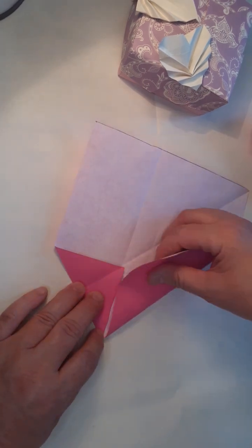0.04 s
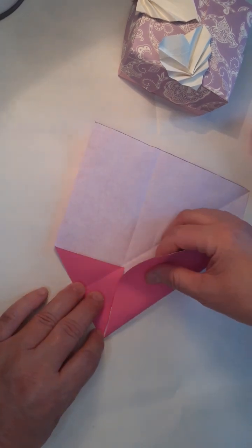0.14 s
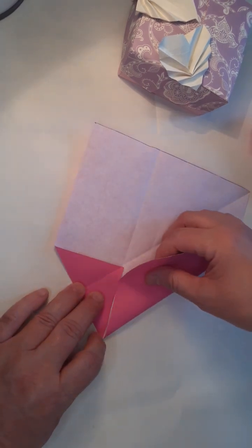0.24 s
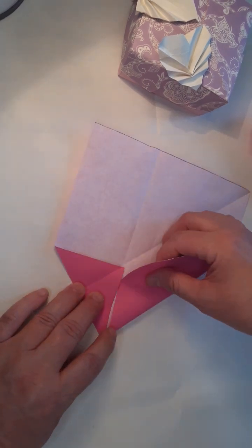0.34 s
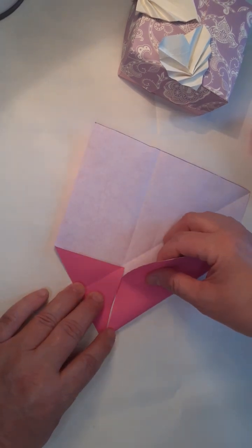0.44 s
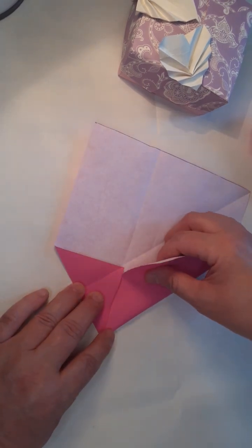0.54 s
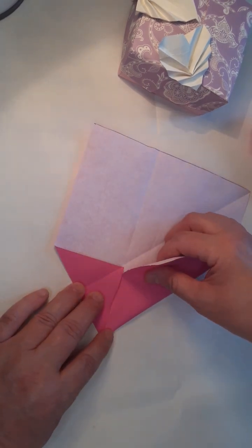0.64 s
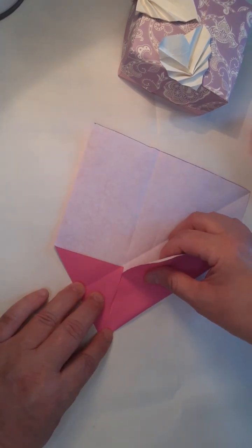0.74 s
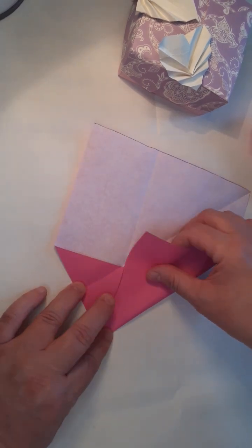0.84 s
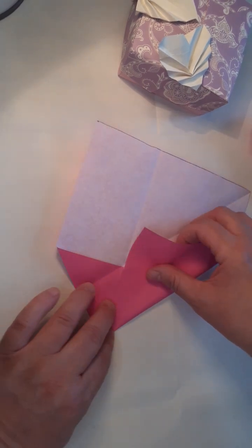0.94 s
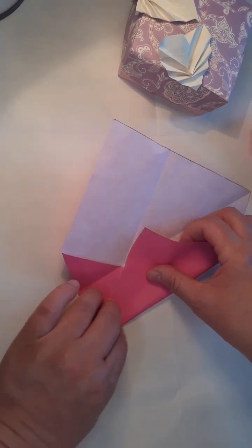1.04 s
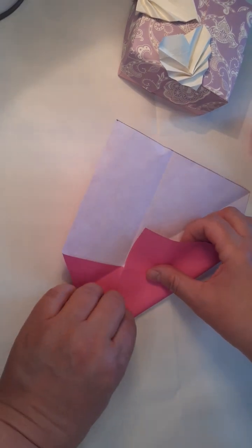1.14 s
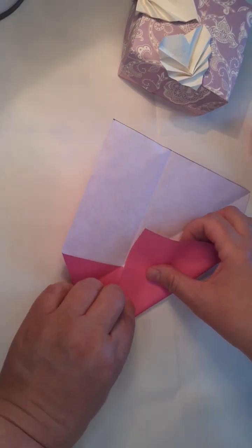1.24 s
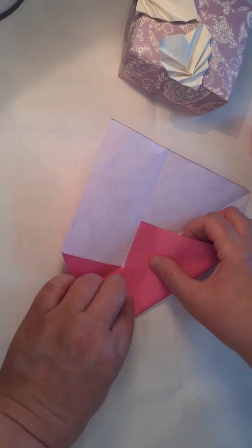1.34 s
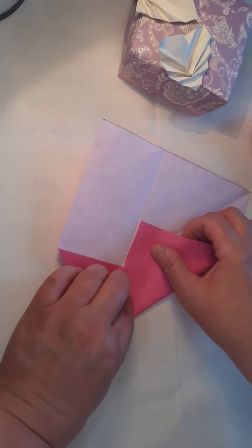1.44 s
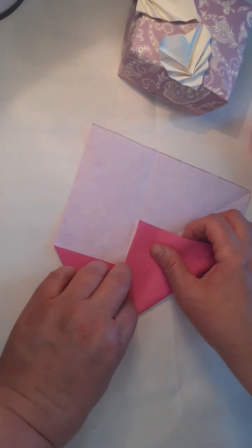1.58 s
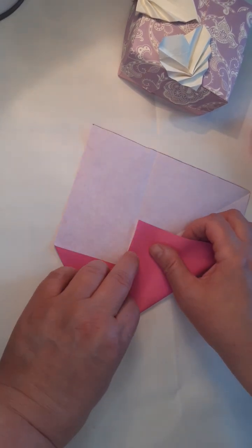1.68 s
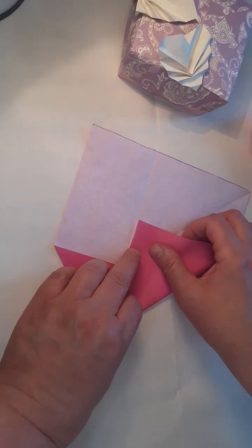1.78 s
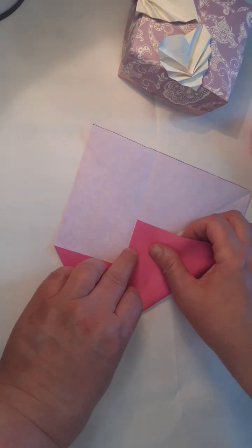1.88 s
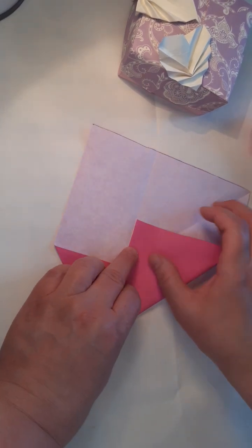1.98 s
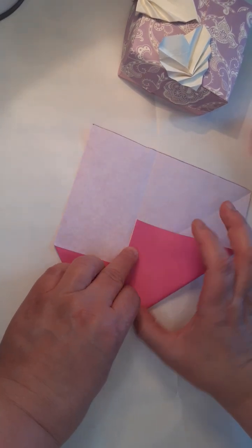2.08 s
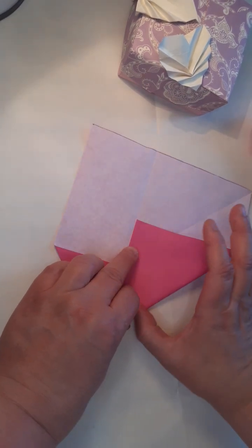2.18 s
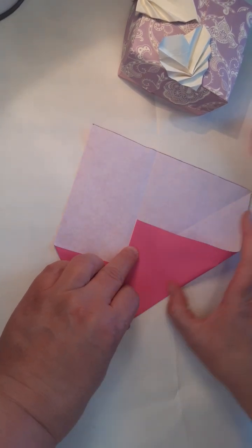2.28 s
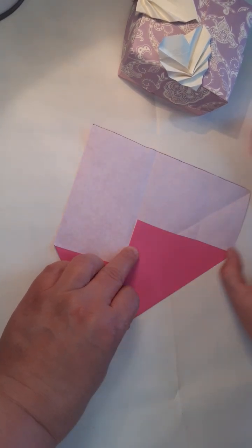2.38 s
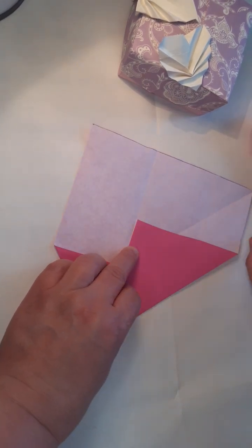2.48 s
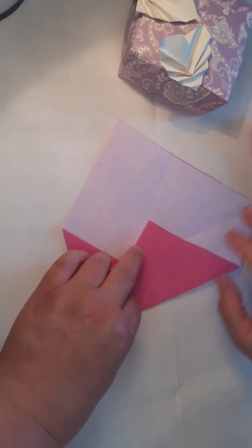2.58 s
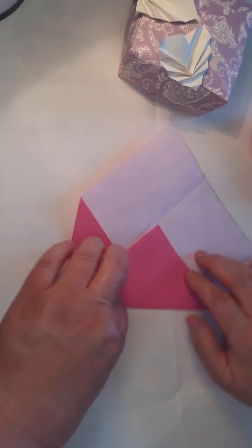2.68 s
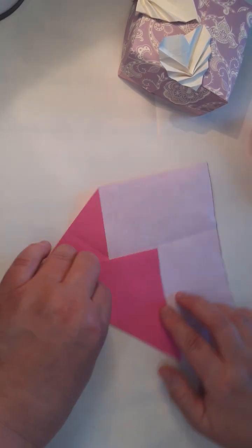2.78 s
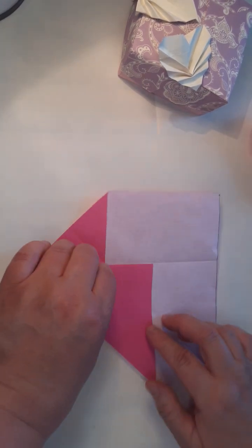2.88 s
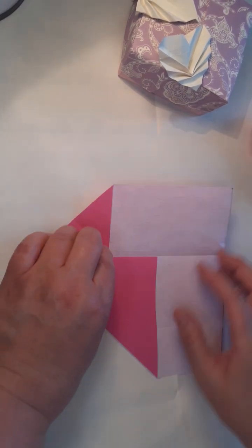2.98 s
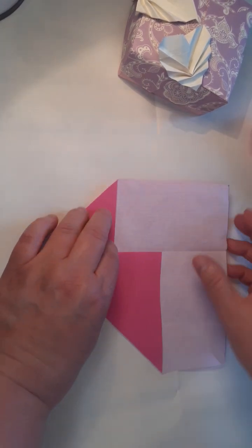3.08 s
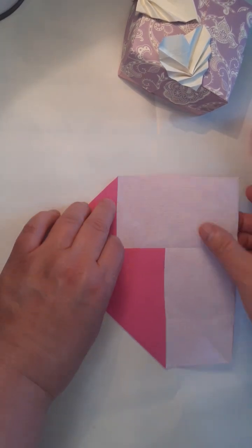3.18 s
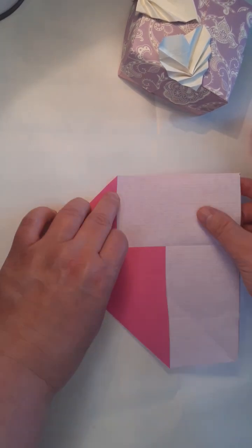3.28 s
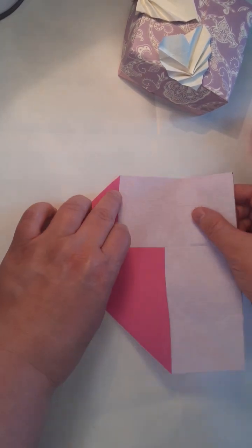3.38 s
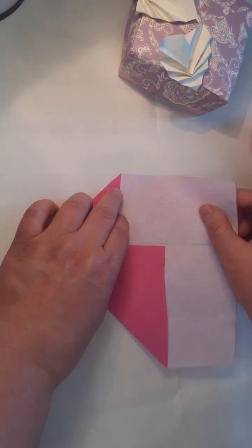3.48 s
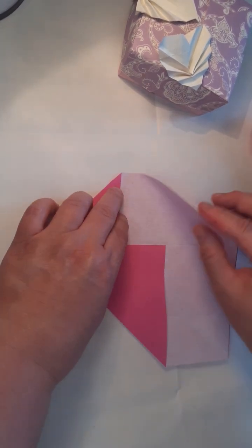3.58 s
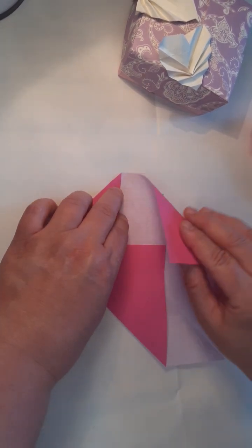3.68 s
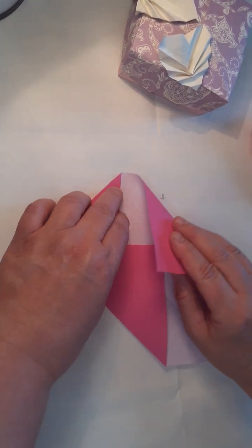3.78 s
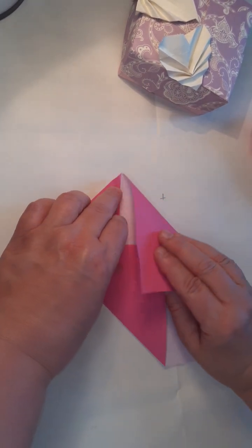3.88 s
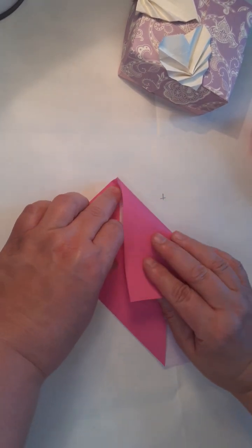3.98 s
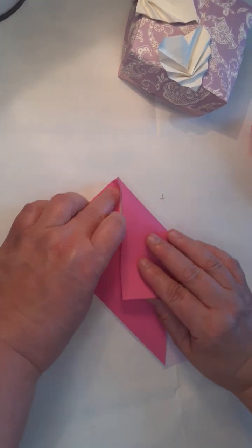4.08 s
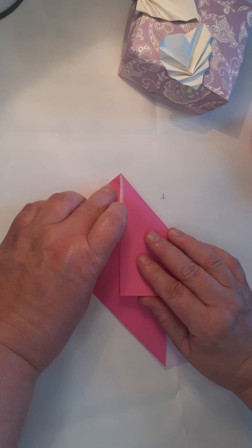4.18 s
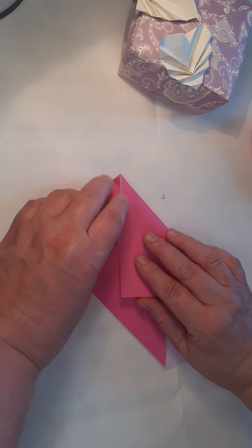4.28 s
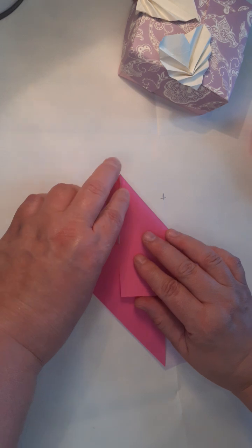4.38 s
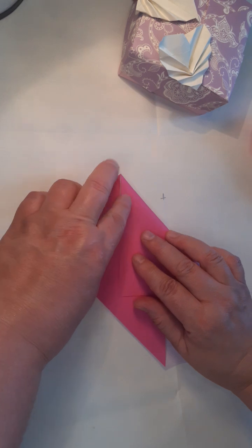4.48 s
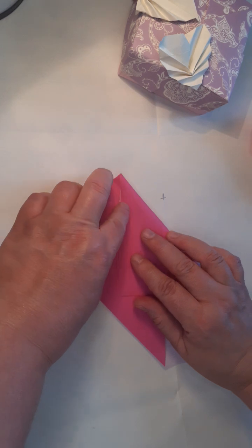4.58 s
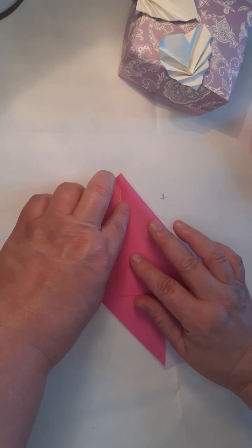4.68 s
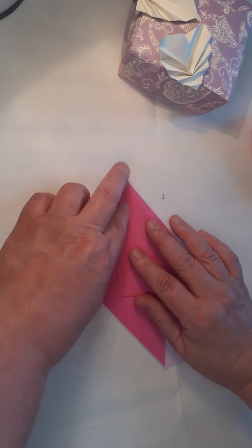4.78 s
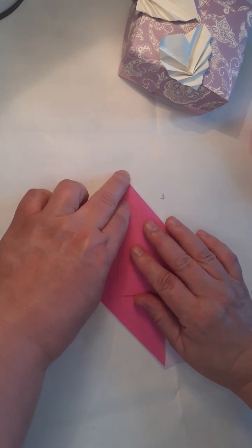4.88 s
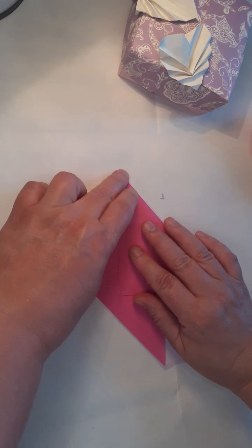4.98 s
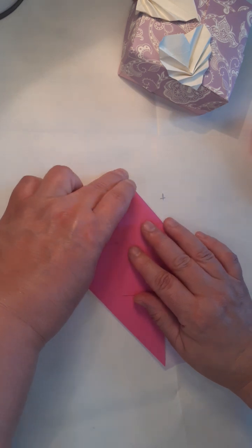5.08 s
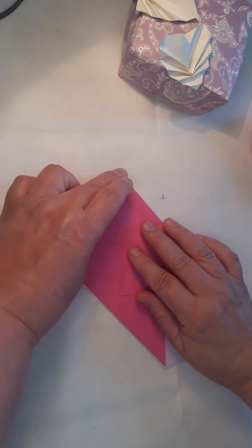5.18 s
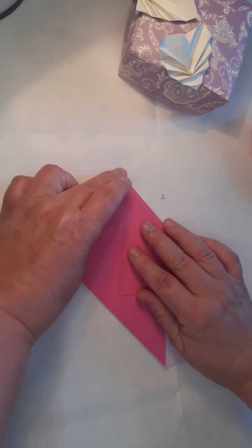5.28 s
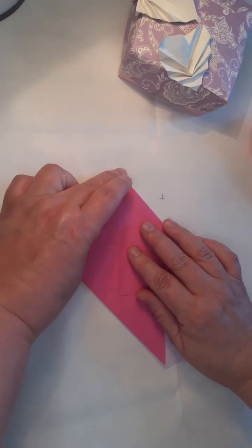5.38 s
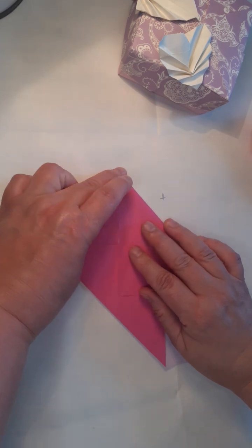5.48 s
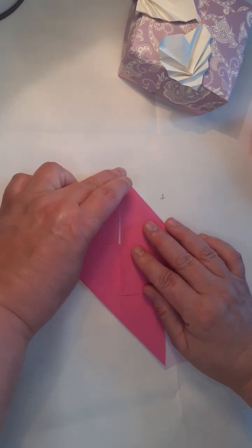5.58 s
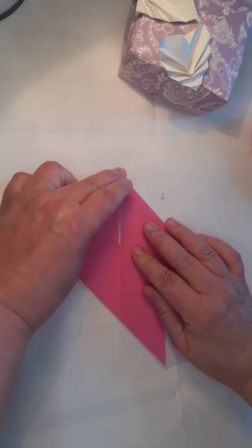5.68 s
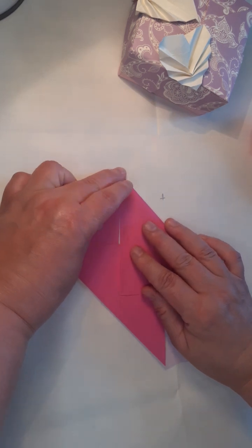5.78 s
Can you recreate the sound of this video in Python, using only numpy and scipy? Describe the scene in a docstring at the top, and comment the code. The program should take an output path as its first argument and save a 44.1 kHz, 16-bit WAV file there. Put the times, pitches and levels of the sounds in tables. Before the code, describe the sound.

Hands fold a paper sheet on a wooden table in a quiet, slightly live room. Faint rustles lead to two sharp crease snaps, then a thumb swishes along the fold and the sheet is turned with an airy slide. A busy cluster of crackles and low finger knocks follows before small, fading rubs. Two spaced close microphones, paper slightly to the right, faint hiss.

```python
"""Quiet room, wooden table, two spaced microphones: hands fold and crease a sheet of paper. Creases snap as
short noise bursts through a ring and two bands; the sheet rustles as fibre ticks on friction noise, ringing in
the air pocket under the fold; sliding fingertips hiss above. Moving hands rumble the table, faint nasal breaths
sound near 600 Hz, and landing fingers knock the table modes; the paper sounds get a short room tail. Faint
microphone hiss lies below."""
import sys
import numpy as np
from scipy import signal
from scipy.fft import rfft, irfft, next_fast_len
from scipy.io import wavfile

SR = 44100
rng = np.random.default_rng(int(sys.argv[2]) if len(sys.argv) > 2 else 0)


def file_out(sig):
    """Save sig as 16-bit WAV at sys.argv[1]."""
    # one column per channel
    cols = np.atleast_2d(sig).T
    # limit, then scale
    lim = np.clip(cols, -1, 1)
    pcm = np.round(lim * 32767).astype(np.int16)
    wavfile.write(sys.argv[1], SR, pcm)


def undo_db(level):
    """Turn decibels back into plain size, where 20 dB means ten times bigger."""
    steps = np.asarray(level, float) / 20
    return 10 ** steps


N = 257569


def rms_one(x):
    """Scale to rms 1."""
    return x / np.sqrt(np.mean(x ** 2) + 1e-20)


def in_time(rows):
    """Interpolate each column after the time [s] to one value per sample."""
    time_s, *columns = np.transpose(rows)
    t = np.arange(N) / SR
    return [np.interp(t, time_s, column) for column in columns]


def coloured(x, spectrum):
    """Shape white sound by a (frequency [Hz], level [dB]) table; rms 1."""
    size = next_fast_len(N)
    hz, db = np.transpose(spectrum)
    log_hz = np.log(np.arange(size // 2 + 1) * SR / size + 1)
    gain = undo_db(np.interp(log_hz, np.log(hz), db))
    return rms_one(irfft(rfft(x, size) * gain, size)[..., :N])


def drift(rate_hz):
    """Slow random curve, rms 1: twice low-passed noise at SR / 40, interpolated."""
    step = 40
    r = np.exp(-2 * np.pi * rate_hz * step / SR)
    settle = 2000
    noise = rng.standard_normal(N // step + settle + 2)
    slow = signal.lfilter([1], [1, -2 * r, r * r], noise)[settle:]
    return np.interp(np.arange(N) / step, np.arange(len(slow)), rms_one(slow))


def resonance(hz, width_hz):
    """Two-pole filter coefficients (b, a), peak gain about 1."""
    r = np.exp(-np.pi * width_hz / SR)
    b = (1 - r * r) / 2 * np.array([1, 0, -1])
    return b, [1, -2 * r * np.cos(2 * np.pi * hz / SR), r * r]


def band_pass(order, edges_hz, x):
    """Butterworth band-pass."""
    return signal.sosfilt(signal.butter(order, edges_hz, "band", fs=SR, output="sos"), x)


def two_mics(noise, likeness):
    """An extended source gives each microphone a common part (power share: likeness) and its own."""
    alike = np.clip(likeness, 0, 1)
    return np.sqrt(alike) * noise[0] + np.sqrt(1 - alike) * noise[1:]


def grains(per_s, smooth, clump_db, likeness):
    """Fibres catching: millisecond ticks of uneven size on clumped friction noise; rms 1."""
    catches = rng.random(N) < per_s / SR
    sizes = undo_db(4.5 * np.minimum(rng.exponential(1, N), 3.2)) * catches
    ticks = signal.lfilter([1], [1, -np.exp(-1000 / SR)], sizes)   # 1 ms decay
    envelope = rms_one(ticks) + smooth
    rough = envelope * two_mics(rng.standard_normal((3, N)), likeness)
    return rms_one(rough * undo_db(clump_db * drift(27)))


# microphone noise spectrum: (frequency [Hz], relative density [dB])
MIC_SPECTRUM = [(25, -11.5), (60, 6), (120, 8), (1000, -3.5), (4000, -6), (8000, -4), (13000, -5),
                (16500, -12)]


def microphone_hiss():
    """Self-noise: independent coloured noise in each microphone."""
    level_db = -78.5
    return undo_db(level_db) * coloured(rng.standard_normal((2, N)), MIC_SPECTRUM)


def room(x):
    """Dense tail after the trip to the nearest wall, treble dying sooner; independent per microphone."""
    t60_s, first_wall_s, wall_cut_hz, level_db = 0.34, 0.012, 8500, -16.5
    t = np.arange(SR // 2) / SR
    onset = 1 - np.exp(-(t / first_wall_s) ** 4)
    noise = rng.standard_normal((2, len(t))) * onset
    dull = signal.sosfilt(signal.butter(2, wall_cut_hz, fs=SR, output="sos"), noise)
    decay = undo_db(-60 * t / t60_s)
    tail = (dull + 0.3 * (noise - dull) * decay) * decay
    tail = rms_one(tail) / np.sqrt(len(t))   # unit energy
    return undo_db(level_db) * signal.fftconvolve(x, tail, axes=1)[:, :N]


# table-top modes, the upper ones (above 420 Hz) also shaping faint breaths: (frequency [Hz], width of one
# filter pass [Hz], relative level [dB])
TABLE_MODES = [(126.4, 49, -4.5), (166, 79, -0.5), (269, 48.8, 4.5), (314.6, 72, 4.5), (495.3, 46, -5),
               (573, 139, -3), (756, 59, -16)]
# hands dragging on the table, and faint nasal breaths: (time [s], lower-mode rumble [dB], upper-mode breath
# band re lower [dB])
RUMBLE_AND_BREATH = [(0, -72.5, -8.5), (.7, -69.5, -9), (1.25, -66.5, -3.5), (1.6, -74, -16), (1.75, -71, 1.5),
                     (1.97, -65.5, -0.5), (2.11, -53.5, -14.5), (2.31, -59, -5.5), (2.35, -46.5, -3.5),
                     (2.47, -42, -13.5), (2.55, -65, -12), (2.75, -67.5, -3.5), (3.1, -63, -3.5),
                     (3.35, -67.5, -3), (3.62, -57.5, -8), (3.83, -70, -11.5), (4.3, -62, -1.5),
                     (4.55, -65, -1.5), (4.67, -60.5, 2), (4.9, -70.5, -14), (5.08, -69.5, -6), (5.2, -61, -10.5),
                     (5.47, -62.5, -1.5), (5.84, -60.5, -12)]


def rumble_and_breath(rustle_gain):
    """Dragging hands and every move of the sheet excite the table modes with noise; the upper band, near 600
    Hz, carries faint nasal breaths."""
    shake_db, linger_s = -9, 0.01   # shake re sheet rustle
    upper_pan_db, likeness = -3.5, 0.78
    rumble_db, upper_db = in_time(RUMBLE_AND_BREATH)
    linger = np.exp(-1 / (linger_s * SR))
    shake_power = undo_db(shake_db) ** 2 * signal.lfilter([1 - linger], [1, -linger], rustle_gain ** 2)
    drag = two_mics(rng.standard_normal((3, N)), likeness) * undo_db(1.5 * drift(20))
    lower, upper = 0, 0
    for hz, width_hz, level_db in TABLE_MODES:
        b, a = resonance(hz, width_hz)
        once = signal.lfilter(b, a, drag)
        shaken = undo_db(level_db) * signal.lfilter(b, a, once)   # twice: dark valleys
        if hz < 420:
            lower = lower + shaken
        else:
            upper = upper + shaken
    upper_gain = undo_db(upper_db + [[upper_pan_db / 2], [-upper_pan_db / 2]])
    modes = rms_one(lower) + upper_gain * rms_one(upper)
    return np.sqrt(undo_db(rumble_db) ** 2 + shake_power) * modes


# fingers landing on the table: (time [s], peak before panning [dB], hardness: push top / 2.9 [Hz])
FINGER_LANDINGS = [(0.807, -43.5, 350), (1.213, -39.5, 296.2), (2.075, -49, 229), (2.097, -61, 320),
                   (2.2025, -40, 200), (2.737, -45, 54), (1.342, -45.5, 350), (3.061, -41.5, 350),
                   (3.25, -40.5, 298), (3.398, -31.5, 400), (3.508, -32, 603), (3.534, -45.5, 350),
                   (3.682, -33, 450), (3.889, -40, 339), (4.206, -36, 318)]


def knocks():
    """Flesh is a slow hammer: a band-limited push rings the modes; harder touches reach higher ones."""
    length = 4096
    out = np.zeros(N + length)
    click = signal.unit_impulse(length)
    rung = click / 20
    for hz, width_hz, level_db in TABLE_MODES:
        rung = rung + undo_db(level_db) * signal.lfilter(*resonance(hz, 2 * width_hz), click)
    for time_s, peak_db, hardness_hz in FINGER_LANDINGS:
        knock = band_pass(2, [65, 2.9 * hardness_hz], rung)
        i = round(time_s * SR)
        out[i:i + length] += undo_db(peak_db) * knock / np.abs(knock).max()
    return out[:N]


# levels below precede the mix trims
# a hand shifts, speeding up and slowing: (fastest [s], length [s], rustle [dB], fingertip hiss [dB])
HAND_SHIFTS = [(0.065, 0.11, -59, -55), (0.214, 0.13, -67.5, -58.5), (0.292, 0.081, -72, -58.5),
               (0.387, 0.085, -75, -64), (0.507, 0.13, -61.5, -51.5), (0.98, 0.24, -64, -62),
               (1.083, 0.061, -57, -48.5), (1.386, 0.26, -53, -51), (1.609, 0.11, -80, -61.5),
               (1.685, 0.08, -67, -57.5), (1.798, 1, -74.5, -76.5), (2.016, 0.15, -56, -51.5),
               (2.16, 0.091, -61, -49.5), (3.084, 0.34, -54, -50.5), (3.239, .09, -45.5, -49.5),
               (3.38, 0.093, -52, -60), (3.462, 0.28, -53, -59), (3.615, 0.12, -56.5, -61.5),
               (3.962, 0.22, -60, -60), (4.044, .06, -75, -59.5), (4.113, 0.13, -56, -55),
               (4.211, .11, -45.5, -54), (4.36, 0.9, -71, -73.5), (4.466, 0.226, -64, -63),
               (4.617, 0.17, -60.5, -57.5), (4.777, .15, -72.5, -68), (5.2, 0.99, -93, -76.5),
               (5.591, 0.21, -69.5, -65)]
# the sheet springs back at once, settles: (peak [s], length [s], rustle [dB], fingertip hiss [dB])
SHEET_RECOILS = [(0.769, 0.19, -56.5, -52.5), (0.814, 0.08, -41.5, -41.5), (0.87, 0.31, -56.5, -58),
                 (1.223, 0.095, -51.5, -57), (3.388, 0.1, -47, -67.5), (3.524, 0.15, -48.5, -49.5),
                 (3.697, 0.089, -51, -51.5), (3.895, 0.11, -50.5, -82), (4.917, 0.14, -69, -67),
                 (5.01, 0.18, -84, -69)]
# thumb along the crease, then the sheet turned: (time [s], rustle [dB], fingertip hiss [dB])
LONG_STROKES = [(2.17, -87, -76.5), (2.255, -60, -50.5), (2.278, -46.5, -50), (2.394, -42, -39.5),
                (2.465, -49, -45), (2.522, -67, -68), (2.572, -71, -72), (2.627, -58, -49.5),
                (2.709, -53, -49), (2.739, -51.5, -38.5), (2.839, -53, -34.5), (2.893, -52, -35),
                (2.934, -58.5, -46.5), (2.955, -69, -62), (3.05, -120, -120)]


def motion():
    """Gains of rustle and hiss: each move swells to its peak and fades; powers add."""
    shift_rise_share, recoil_rise_s = 0.51, 0.0087
    shift_flatness, recoil_flatness = 1.3, 1.23   # 1 = pointed peak; more = steady middle, quick ends
    edge_db = -20.5   # level at both ends of a move re its peak
    t = np.arange(N) / SR
    power = undo_db(np.array(in_time([(0, -120, -120)] + LONG_STROKES))) ** 2
    moves = [(row, shift_rise_share * row[1], shift_flatness) for row in HAND_SHIFTS]
    moves += [(row, recoil_rise_s, recoil_flatness) for row in SHEET_RECOILS]
    for (peak_s, length_s, rustle_db, hiss_db), rise_s, flatness in moves:
        start = max(0, int((peak_s - 3 * rise_s) * SR))
        near = slice(start, int((peak_s + 3 * length_s) * SR))
        before = (peak_s - t[near]) / rise_s
        after = (t[near] - peak_s) / max(length_s - rise_s, 1e-3)
        away = np.maximum(before, after)   # 0 at the peak, 1 at the ends
        power[:, near] += undo_db(edge_db * away ** flatness + [[rustle_db], [hiss_db]]) ** 2
    return np.sqrt(power)


# sheet rustle spectrum: (frequency [Hz], relative density [dB])
RUSTLE_SPECTRUM = [(900, -34.5), (1500, -1), (2500, 2.5), (4500, -1.5), (6500, -12.5)]
# fingertip friction spectrum: (frequency [Hz], relative density [dB])
FINGERTIP_SPECTRUM = [(2060, -35.5), (3000, -10.5), (6000, -1.5), (8700, 0), (10500, -5.5), (13000, 1),
                      (15400, -2), (16200, -24.5), (16500, -41)]
# fold shape: (time [s], air-pocket pitch [Hz], pocket ring re rustle [dB], loose flap re rustle [dB])
FOLD_SHAPE = [(0, 3300, -15, -42), (.3, 3400, 18, -1), (.55, 3450, 14.5, -8), (.75, 3000, -16, -9.5),
              (1.24, 5500, 3, -12), (1.36, 2500, -13, -9.5), (2.2, 2400, -20, -23), (2.4, 2500, -48, -1.5),
              (2.8, 3500, -23, -19.5), (3.25, 2200, -4, -5), (3.42, 1578, -4.5, -4), (4.12, 2250, -1, 0),
              (4.3, 2270, -14.5, -5.5), (4.93, 2860, -5, -5.5), (5.84, 2200, -1.5, 6)]


def slide(rustle_gain, hiss_gain):
    """Rustle rings in an air pocket under the fold, a loose sheet flaps low; fingertips hiss above."""
    pocket_hz, pocket_db, flap_db = in_time(FOLD_SHAPE)
    fibres = grains(120, smooth=3.5, clump_db=2.5, likeness=0.11)
    rustle = coloured(fibres, RUSTLE_SPECTRUM)
    flap = band_pass(2, [550, 1500], fibres)
    pocket, state = np.zeros((2, N)), np.zeros((2, 2))
    block = 256
    for i in range(0, N, block):
        b, a = resonance(pocket_hz[i], 0.18 * pocket_hz[i])
        part = slice(i, i + block)
        pocket[:, part], state = signal.lfilter(b, a, rustle[:, part], zi=state)
    sheet = rustle + undo_db(pocket_db) * rms_one(pocket) + undo_db(flap_db) * rms_one(flap)
    fingertips = grains(100, smooth=7.7, clump_db=2.0, likeness=0.08)
    return rustle_gain * sheet + hiss_gain * coloured(fingertips, FINGERTIP_SPECTRUM)


# creases buckling, levels referred to 8 ms before ring and mix gains:
# (time [s], body level [dB], ring [Hz], treble level [dB], nominal time to half the energy [ms])
CREASE_SNAPS = [(0.177, -62, 3420, -59, 3.9), (0.19, -62, 4000, -60.5, 1.1), (0.2035, -56, 4880, -52, 3.5),
                (0.258, -53.5, 3780, -51, 4.5), (0.361, -57, 3330, -51.5, 2), (0.456, -59, 4500, -59, 1.5),
                (0.7622, -55.5, 3330, -63.5, 3), (0.8067, -31.5, 3407, -29, 1.2),
                (0.8352, -46, 2033, -40.5, 3.2), (0.9545, -55, 3765, -52, 2.5),
                (0.992, -57, 3700, -57, 3.0), (1.118, -61, 2500, -76, 1.7), (1.1943, -54.5, 3456, -52, 4),
                (1.2112, -28.5, 4640, -21.5, 1), (1.3391, -35.5, 2380, -56, 3.2),
                (1.3774, -64, 3690, -59.5, 2.6), (1.401, -57, 1800, -75, 1.4),
                (1.4327, -50.5, 1940, -65.5, 2.6), (1.939, -66, 5000, -56, 1.1),
                (2.043, -53, 1340, -71, 1.2), (2.076, -62, 4960, -63, 1.8),
                (2.094, -60.5, 5000, -54.5, 4.5), (2.135, -65, 5050, -53, 3.7),
                (2.201, -59, 4910, -56, 4.5), (2.2693, -35, 2420, -44.5, 1.6),
                (2.7299, -45, 5430, -40.5, 3.3), (2.972, -58.5, 1900, -73, 4.0),
                (3.0607, -46.5, 3370, -56, 0.93), (3.2014, -35, 2980, -37, 0.93),
                (3.216, -46, 2890, -61.5, 1.1), (3.2301, -38.5, 2205, -37.5, 2.4),
                (3.2482, -42.5, 1870, -67, 0.99), (3.3665, -53.5, 1700, -59, 1.3),
                (3.388, -44, 1530, -66.5, 0.83), (3.3935, -27, 1552, -37.5, 2.8),
                (3.45, -49, 1500, -66.5, 1.8), (3.5073, -30.5, 3210, -33.5, 1.13),
                (3.531, -47.5, 3194, -51, 2.5), (3.591, -44, 2137, -64, 2.1),
                (3.599, -49.5, 2600, -65, 2.0), (3.6824, -28.5, 2355, -34.5, 1.9),
                (3.8918, -38.5, 2350, -72, 1.5), (4.198, -32.5, 997, -38.5, 4.6),
                (4.3845, -54.5, 2380, -84, 1.6), (4.466, -62, 2970, -53, 1.1),
                (4.6118, -50.5, 4610, -59.5, 1.9), (4.619, -56, 1600, -66, 2), (4.917, -69, 4050, -61, 5),
                (4.947, -61, 2640, -65, 1.2), (5.577, -81, 2970, -60, 1.4)]


def snaps():
    """A crease gives way in a run of fibre breaks that swells and dies; slow ones are soft puffs."""
    length = 2048
    out = np.zeros((2, N + length))
    ms = 1000 * np.arange(length) / SR
    draws = rng.standard_normal((len(CREASE_SNAPS), 7, length))
    per_8_ms = np.sqrt(8 / ms[-1])   # rms over the whole burst, restated over 8 ms
    for (time_s, body_db, hz, treble_db, half_ms), draw in zip(CREASE_SNAPS, draws):
        u = 1.5 * ms / half_ms
        late_breaks = 0.07 * np.minimum(u, 1) * np.exp(-ms / 5.0)
        shape = (u * np.exp(-u) + late_breaks) * np.abs(draw[6]) ** 0.7
        buckle = two_mics(draw[:3], 0.12) * shape
        crackle = two_mics(draw[3:6], 0.1) * shape ** 1.4
        ring = signal.lfilter(*resonance(hz, 0.16 * hz), buckle)
        # small buckles radiate no bass, wide ones no treble
        body = band_pass(3, [min(0.62 * hz, 1800), min(2.8 * hz, 6000)], buckle)
        ring_share = 1400 / hz   # wide, low buckles ring most
        snap = undo_db(body_db) * rms_one(ring_share * rms_one(ring) + rms_one(body))
        snap += undo_db(treble_db) * rms_one(band_pass(2, [5200, 13000], crackle))
        i = round(time_s * SR)
        out[:, i:i + length] += per_8_ms * snap
    return out[:, :N]


# hands between the microphones: (time [s], table and breath left re right [dB], paper left re right [dB])
HAND_POSITION = [(0.0, -2, -10), (0.06, -11.5, -2), (0.55, -4.5, -0.5), (0.65, -12, -1.5), (2.54, -3.5, 0),
                 (3.01, -9, -2.5), (3.48, -5, 0.5), (4.06, -9.5, -2.5), (5.58, -6, -7), (5.84, -6, -6)]


def scene():
    """Panned paper, table and breath, plus the room tail of the unpanned paper."""
    rustle_gain, hiss_gain = motion()
    table_pan_db, paper_pan_db = in_time(HAND_POSITION)
    sliding = undo_db(-2.5) * slide(rustle_gain, hiss_gain)
    creases = undo_db(-2.0) * snaps()
    paper = (sliding + creases) * undo_db([paper_pan_db / 2, -paper_pan_db / 2])
    table = rumble_and_breath(rustle_gain) + knocks()
    table = table * undo_db([table_pan_db / 2, -table_pan_db / 2])
    return paper + room(creases + undo_db(-5.0) * sliding) + table


def low_pass(x):
    """Removes everything above the highest recorded frequency."""
    return signal.sosfilt(signal.butter(12, 16980, fs=SR, output="sos"), x)


def record(dry):
    """Each microphone adds its own hiss."""
    mix = dry + microphone_hiss()
    return low_pass(mix)


dry = scene()
out = record(dry)
file_out(out)
```